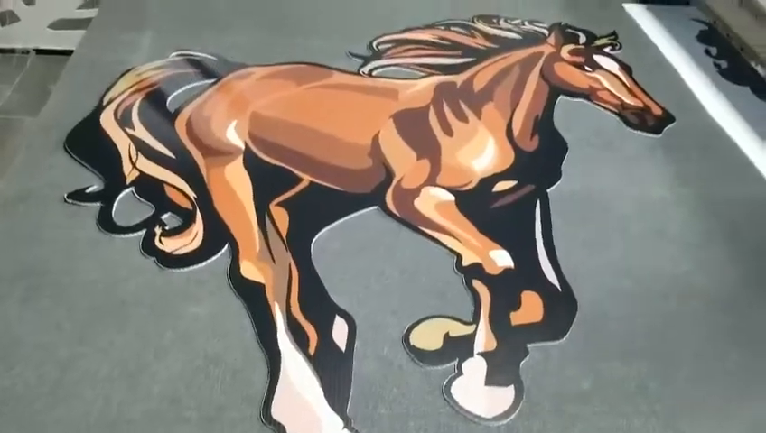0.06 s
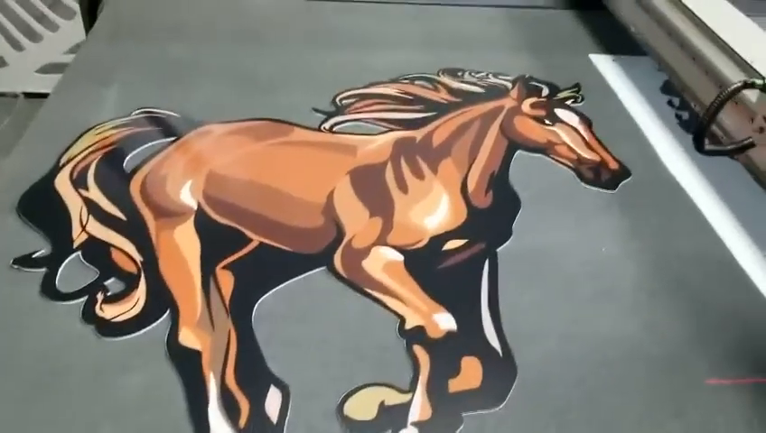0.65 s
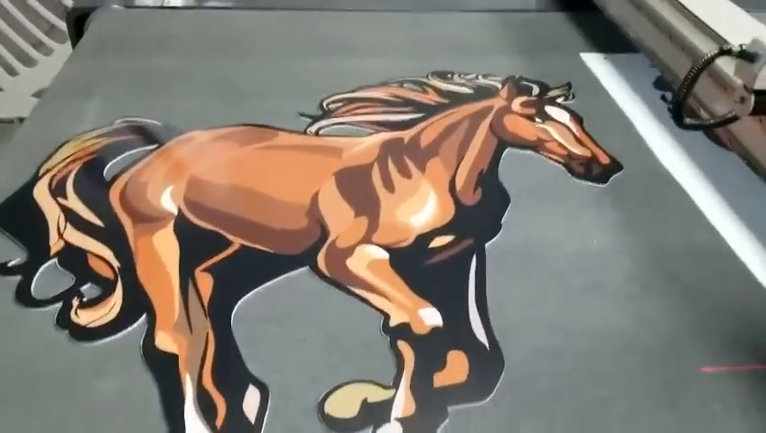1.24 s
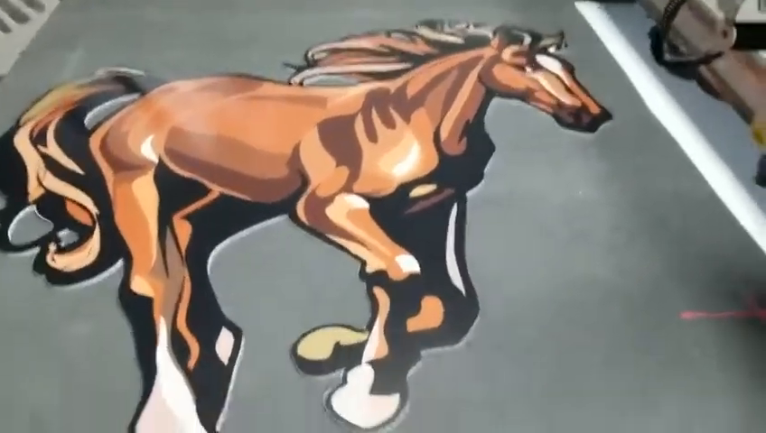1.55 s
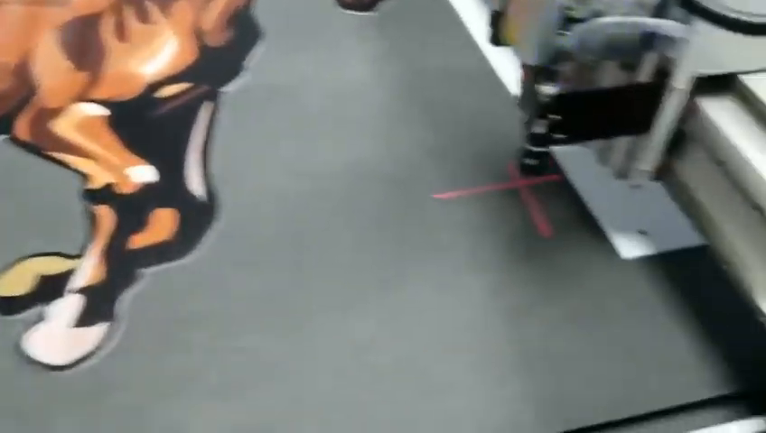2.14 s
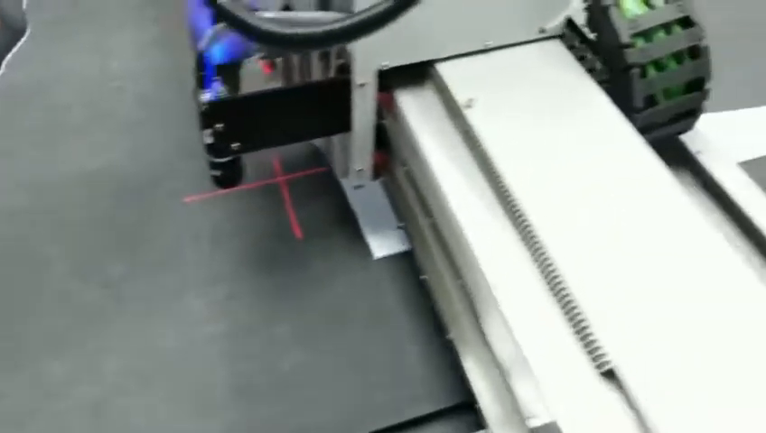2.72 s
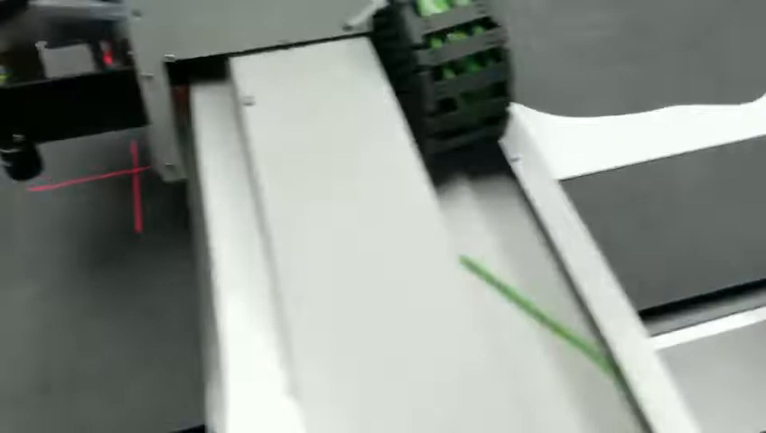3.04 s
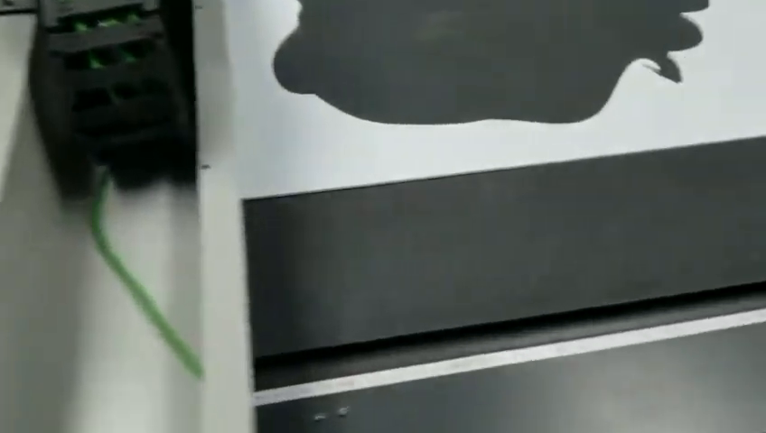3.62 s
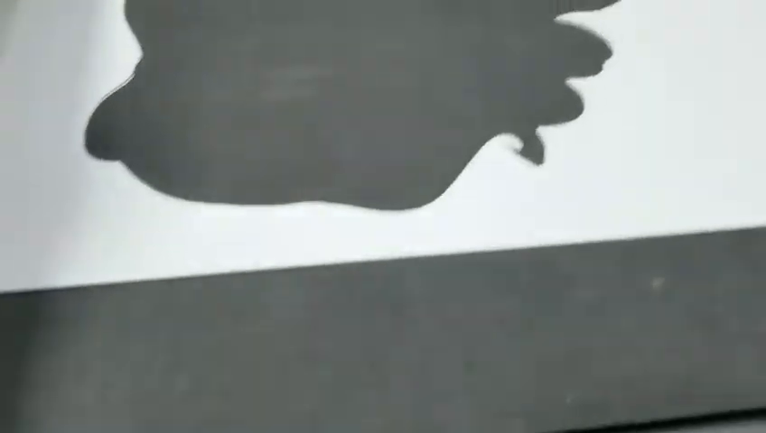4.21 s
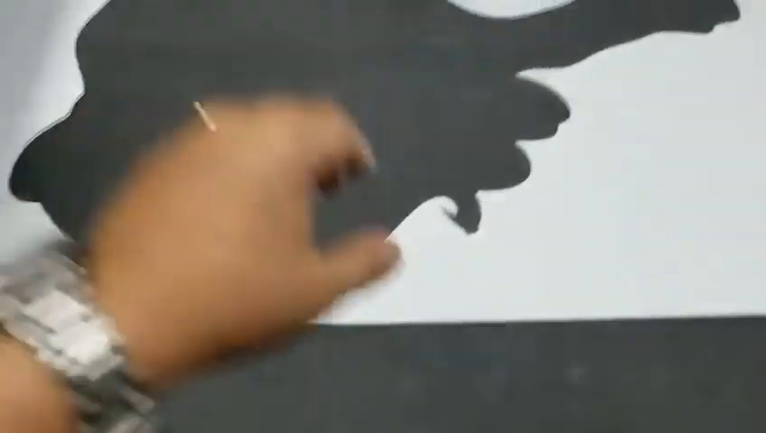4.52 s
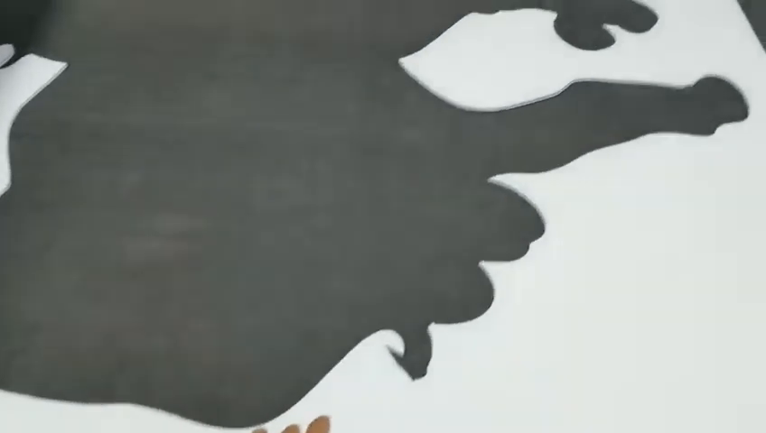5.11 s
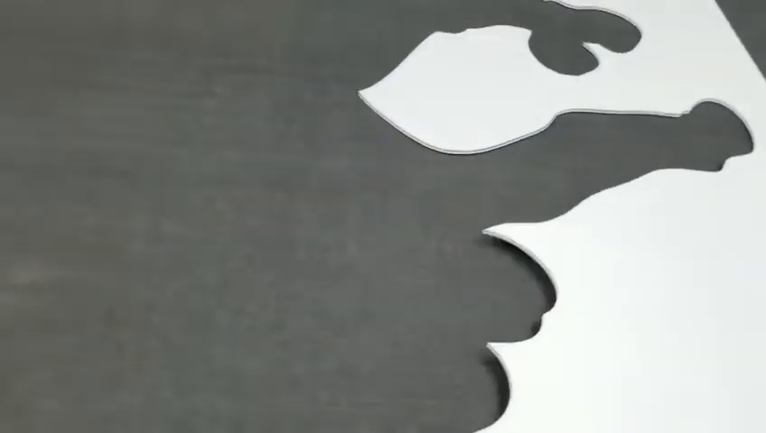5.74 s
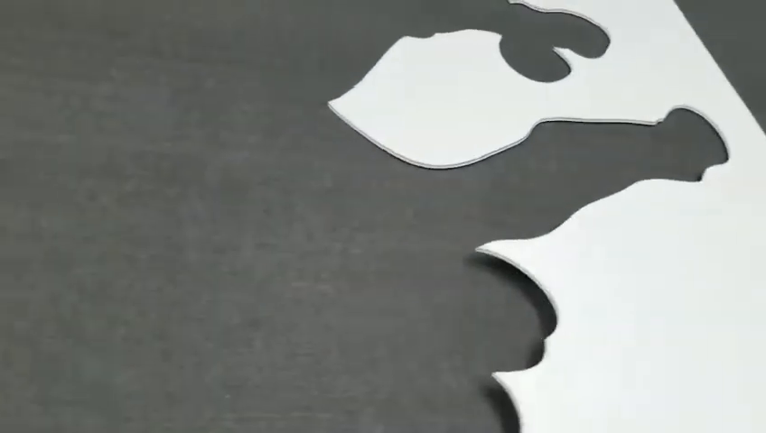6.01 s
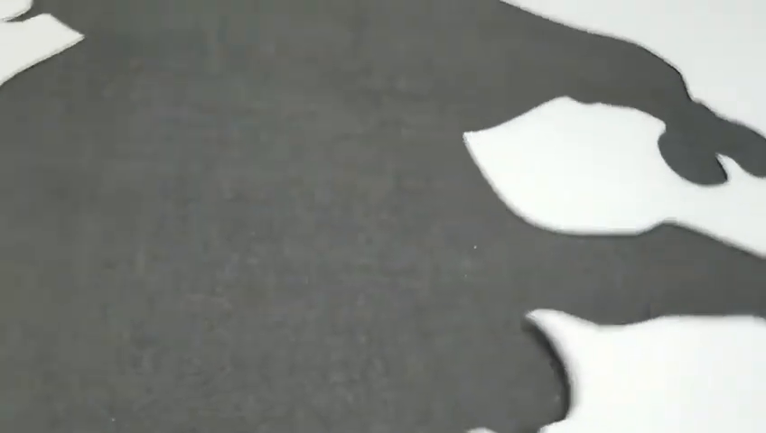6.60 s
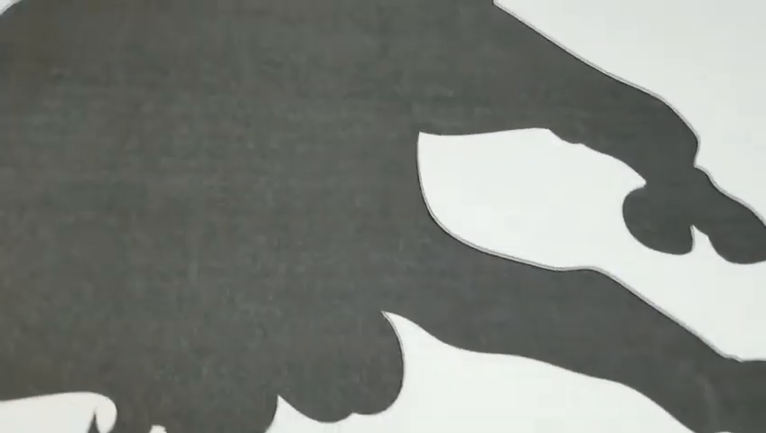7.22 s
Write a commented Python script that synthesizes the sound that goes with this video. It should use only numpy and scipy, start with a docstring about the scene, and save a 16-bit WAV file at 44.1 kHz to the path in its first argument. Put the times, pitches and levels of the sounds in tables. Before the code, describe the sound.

Air rushes and hums from an idling cutting table in a workshop, with a faint high whine and soft whistles drifting in and out. Light rustles and scuffs pass near the moving microphone. Toward the end a stiff sheet slides across the felt with a growing hiss, then gives two sharp, dry cracks with a few dull knocks, much louder than the machine.

```python
"""Sheet dragged off a cutting table

A flatbed cutter idles in a workshop: its blower hums, air whistles into the vacuum bed, servo drives
whine and motors drone low. Someone walks along the table with a few soft scuffs, then drags a cut
sheet over the felt. The stiff sheet hisses as it slides and snaps loudly twice as it bends free."""
import sys
import numpy as np
from scipy import signal
from scipy.fft import rfft, irfft
from scipy.io import wavfile
from scipy.ndimage import uniform_filter1d

SR = 44100
rng = np.random.default_rng(int(sys.argv[2]) if len(sys.argv) > 2 else 0)


def waveform_to_disk(signal):
    """Save audio, clipped to [-1, 1], as 16-bit WAV at the path in sys.argv[1]."""
    frames = np.transpose(np.atleast_2d(signal))
    scaled = np.clip(frames, -1, 1) * 32767
    samples = np.round(scaled).astype(np.int16)
    wavfile.write(sys.argv[1], SR, samples)


N = 324576
TIME = np.arange(N) / SR
BINS = np.fft.rfftfreq(N, 1 / SR)


# Fader rides for the long drag and the short one, louder as the sheet speeds up: t/s, level/dB
LONG_DRAG = [(5.04, -47), (5.11, -49), (5.18, -39.5), (5.27, -39.5), (5.35, -46), (5.47, -42.5),
             (5.82, -40.5), (6.03, -38), (6.29, -42), (6.48, -47.5), (6.6, -78)]
SHORT_DRAG = [(6.8, -62), (6.84, -64), (6.92, -58.5), (7.02, -47.5), (7.11, -50), (7.21, -51.5),
              (7.28, -52), (7.36, -51)]
# EQ of the bright felt hiss and of the lower rasp: f/Hz, level/dB
HISS_EQ = [(1500, -13.5), (2400, -6), (3200, -8), (4400, -5), (6500, -12), (9000, -9.5), (11000, -3.5),
           (12700, 4), (15500, 0)]
RASP_EQ = [(250, -7.5), (700, -9), (1100, -5.5), (1350, -7), (1650, -4.5), (1950, -5.5), (2450, -7.5),
           (3000, -13.5), (4000, -12), (7000, -21)]
# Stereo spread of the sheet: f/Hz, left minus right/dB
SHEET_PAN = [(600, 2.5), (1300, -4.5), (2400, -9), (4400, -2), (8000, 5), (12000, 1.5), (14500, 7)]
# Hollow body of the bed under the sheet: f/Hz, width/Hz, level/dB
BED_MODES = [(335, 26, -5), (439, 14, -0.5)]
def sliding(hiss_trim_db=3.5, rasp_db=-42, rasp_follow=0.5, usual_drag_db=-39, flat_sheet_db=-6.5):
    """Felt fibres hiss under the sheet; its bend radiates a stuttering rasp and the bed murmurs."""
    pan = panned(read(SHEET_PAN, BINS))
    hiss = noise(pan * gain_of(read(HISS_EQ, BINS)), grain_db=1.5)
    rasp = noise(pan * gain_of(read(RASP_EQ, BINS)), grain_db=3.8) * gain_of(drift(70))
    bend = np.clip((TIME - 5.07) / 0.76, 0, 1)  # 0 lying flat, 1 bent up
    murmur = envelope(5.14, length_s=0.48, attack_s=0.2, release_s=0.55) * gain_of(-51)
    out = murmur * unit_rms(resonances(BED_MODES))
    for drag in (LONG_DRAG, SHORT_DRAG):
        drag_db, = curves(drag)
        start, end = drag[0][0], drag[-1][0]
        gate = envelope(start, end - start, attack_s=0.034, release_s=0.034)
        rasp_ride = rasp_db + rasp_follow * (drag_db - usual_drag_db) + flat_sheet_db * (1 - bend)
        out += gate * (gain_of(drag_db + hiss_trim_db) * hiss + gain_of(rasp_ride) * rasp)
    catching = gain_of(drift(33))
    return out * catching


# Bending resonances of the sheet: f/Hz, width/Hz, level/dB
BEND_MODES = [(1110, 160, -7.5), (1900, 77, -2), (2070, 400, -1), (2310, 250, -4), (2560, 110, -7)]
def chatter(level_db=-37, stutter_db=0.5):
    """Stick and slip shakes the bent sheet as it is pulled hardest."""
    pull = envelope(5.96, length_s=0.2, attack_s=0.12, release_s=0.03)
    level = pull * gain_of(level_db - stutter_db * drift(90))
    return level * panned(side_db=-7) * unit_rms(resonances(BEND_MODES))


# EQ of a dry buckling crack: f/Hz, level/dB
CRACK_EQ = [(200, -25), (400, -6), (850, 2.5), (1350, 5.5), (1800, 4.5), (2700, -2), (3400, -3.5),
            (4500, 3), (5400, -4), (9300, -15), (11000, -11), (12600, -10), (15500, -10.5)]
def crack(tilt_db, side_db, ring_db, folds_hz, tick_hz, fold_octaves=0.18, tick_db=9, tick_width_hz=750):
    """One jerk of a crease: a sharp pulse that rings the folds, with a high tick on top."""
    hz = np.maximum(abs(np.fft.fftfreq(4096, 1 / SR)), 20)
    folds = sum(np.exp(-(np.log2(hz / fold) / fold_octaves) ** 2) for fold in folds_hz)
    tick = np.exp(-((hz - tick_hz) / tick_width_hz) ** 2)
    eq_db = read(CRACK_EQ, hz) + tilt_db * np.log2(hz / folds_hz[0]) + ring_db * folds + tick_db * tick
    gain = gain_of(eq_db) * panned(side_db + read(SHEET_PAN, hz))
    minimum_phase = np.exp(np.conj(signal.hilbert(np.log(gain))))  # the hardest attack for this EQ
    pulse = np.fft.ifft(minimum_phase).real
    return pulse / abs(pulse.mean(0)).max()


# Cues for snaps and taps: t/s, level/dB, tilt/dB per octave, left minus right/dB, crackle/dB, flap/dB,
# fold ring/dB, lower fold/Hz, upper fold/Hz, tick/Hz
SNAP_CUES = [(3.407, -30, -6, 6, -22, -40, 6, 2600, 3600, 12000),
             (6.215, -21, 0, -15, -22, -40, 6, 3280, 4430, 12500),
             (6.35, -31, -7.5, -4, -26, -25, 6, 1000, 1400, 12000),
             (6.4303, -10, 12, -13, -32, -44, 8.3, 3200, 4200, 11900),
             (6.4317, -5.5, -1.5, -4.5, -21, -24, 9.1, 2780, 3380, 12900),
             (6.4424, -27, -1, -6, -30, -44, 11, 3860, 4400, 12000),
             (7.1215, -1, 2, -2, -24, -38, 6.2, 2300, 4630, 13100),
             (7.1235, -21, 6, 4, -24, -44, 3, 2200, 4600, 14200),
             (7.1313, -16, -1, 5, -24, -44, 3, 2200, 4600, 12300)]
# A crease gives way in a quick flam of jerks: t/s from the cue, level/dB
CREASE_JERKS = [(-.0003, -10), (0, 0), (.0007, -12), (.003, -20)]
# Body of the flapping sheet: f/Hz, level/dB, t60/s
FLAP_MODES = [(290, -8, 0.033), (362, -4, 0.044), (527, -8, 0.035), (620, -0.5, 0.044), (780, 1, 0.067),
              (960, 0.5, 0.045), (1160, 9.5, 0.028), (1370, 5.5, 0.015), (2700, 9, 0.0073),
              (3220, 2, 0.009), (4260, 2, 0.0088)]
def snaps(crackle_s=0.0047, rise_s=0.00045):
    """The sheet buckles: dry cracks, a flap of its damped modes and a crackle of parting fibres."""
    out = np.zeros((2, N))
    fibres = noise(gain_of(read(HISS_EQ, BINS)))
    for s, db, tilt_db, side_db, crackle_db, flap_db, ring_db, *folds_hz, tick_hz in SNAP_CUES:
        pulse = crack(tilt_db, side_db, ring_db, folds_hz, tick_hz)
        for delay, jerk_db in CREASE_JERKS:
            add(out, s + delay * rng.uniform(0.9, 1.1), gain_of(db + jerk_db) * pulse)
        t = np.arange(pulse.shape[1]) / SR
        flap = sum(struck(t, hz, flap_db + mode_db, t60, rise_s) for hz, mode_db, t60 in FLAP_MODES)
        crackle = gain_of(crackle_db) * np.exp(-t / crackle_s) * fibres[:, :len(t)]
        add(out, s, gain_of(db) * (panned(side_db) * flap + crackle))
    return out


# Cues for dull thumps: t/s, level/dB, f/Hz, t60/s
BUMP_CUES = [(5.243, -35.5, 403, 0.068), (6.433, -27.5, 340, 0.05), (6.874, -33, 151, 0.056),
             (7.0777, -29.5, 181, 0.02), (7.079, -31.5, 420, 0.022), (7.123, -37, 332, 0.06)]
def bumps(rise_s=0.00032):
    """Hand and sheet knock on the bed, and the felt damps each blow at once."""
    out = np.zeros((2, N))
    t = np.arange(SR // 5) / SR
    for s, db, hz, t60 in BUMP_CUES:
        add(out, s, panned(0) * struck(t, hz, db, t60, rise_s))
    return out


# Cues for soft scuffs: t/s at the crest, length/s, level/dB, tilt/dB per octave
SCUFF_CUES = [(0.452, .012, -49, 6), (1.001, 0.088, -47.5, 1), (3.153, 0.014, -35, 8),
              (3.184, 0.075, -43, 0.5), (3.223, 0.035, -37, -2), (3.249, 0.025, -36.5, -0.5),
              (3.275, 0.044, -44.5, -1), (3.823, 0.087, -52.5, 4.5), (4.042, 0.037, -54, 1),
              (4.473, 0.075, -43.5, 2.5), (4.874, 0.13, -53.5, 4), (5.0, 0.09, -53, 7),
              (5.113, 0.077, -43.5, 1), (5.19, .08, -44, 2.5), (5.254, 0.073, -41.5, -4),
              (5.568, 0.014, -33, -14), (6.036, 0.23, -33, 7), (6.13, 0.13, -36, 1.5),
              (6.927, 0.04, -48, -29), (7.027, 0.047, -48, -3), (7.284, 0.26, -44.5, 5.5)]
# EQ of a scuff: f/Hz, level/dB
SCUFF_EQ = [(500, -35.5), (950, -15), (1500, 1.5), (2500, -0.5), (3300, 2.5), (4400, 1.5), (6500, -3),
            (9500, -10.5), (12500, -1), (15500, -7)]
def scuffs(trim_db=-2, room_db=-8, low_cut_hz=300):
    """Clothes, hand and sheet rub in short swells of fine friction, with a touch of room."""
    out = np.zeros((2, N))
    octaves = np.log2(np.maximum(BINS, 500) / 4000)
    for s, length, db, tilt_db in SCUFF_CUES:
        eq = gain_of(read(SCUFF_EQ, BINS) + tilt_db * octaves) * (BINS > low_cut_hz)
        out += gain_of(db + trim_db) * swell(s, length / 2) * noise(eq, grain_db=2.0)
    return out + gain_of(room_db) * workshop(out)


# Fader rides as the listener walks along the table: t/s, housing/dB, blade tone/dB, air/dB
BLOWER_RIDES = [(0, -53, -50, -47.5), (.75, -58, -50.5, -47), (1.0, -54.5, -53, -47),
                (1.5, -52, -53.5, -46.5), (2.7, -55, -52.5, -47), (3.1, -53, -55, -47.5),
                (3.7, -56, -54, -47.5), (4.2, -57, -59.5, -48), (4.6, -54, -58.5, -48),
                (6.7, -55, -57.5, -48), (7.1, -56, -57, -48.5), (7.36, -70, -58, -58)]
# EQ of the moving air in machine and room: f/Hz, level/dB
AIR_EQ = [(20, -25), (38, -10.5), (52, -2.5), (110, -5.5), (190, -9.5), (300, -14.5), (480, -13.5),
          (600, -15.5), (850, -12.5), (1450, -15.5), (2000, -14), (2600, -16.5), (3000, -28.5),
          (4200, -26.5), (5700, -27), (7000, -42), (9300, -49), (11500, -32.5), (15500, -35.5)]
# Hollow roar of housing and gantry, thin rush of the grille: f/Hz, width/Hz, level/dB
HOUSING_MODES = [(388.7, 47, -1), (438, 33, -4.5)]
GANTRY_MODES = [(382, 19, -3.5), (473, 23, 0)]
GRILLE_MODES = [(1764, 65, -68.5), (2364, 48, -65), (2600, 140, -62.5), (12060, 340, -67.5)]
def blower(gantry_db=-52.5):
    """A wash of turbulent air that rings the housing, the grille and the passing gantry."""
    housing_db, _, air_db = curves(BLOWER_RIDES)
    air = gain_of(air_db) * noise(gain_of(read(AIR_EQ, BINS)))
    housing = gain_of(housing_db) * unit_rms(resonances(HOUSING_MODES))
    pass_by = swell(2.64, half_width_s=1.7)
    gantry = gain_of(gantry_db) * pass_by * unit_rms(resonances(GANTRY_MODES))
    return air + housing + gantry + resonances(GRILLE_MODES)


# Partials of the hum: multiple of the blade tone, level/dB
BLADE_PARTIALS = [(1, 0), (3 / 4, -14)]
# Dead spots and hot spots of the hum: t/s, half width/s, left/dB, right/dB
HUM_SPOTS = [(2.15, 0.24, -20, -7), (2.75, 0.29, 4.5, 1.5), (3.55, 0.24, 3, 2), (4.0, 0.21, 3, -14),
             (4.55, 0.76, 3, 8.5)]
def impeller(blade_hz=520.4, waver=0.0016, trim_db=1.5, right_lag_s=0.0002):
    """The blower's blades hum; each ear moves through its own standing waves."""
    pitch = blade_hz * (1 + waver * drift(26))
    hum = sum(gain_of(db) * tone(order * pitch, stereo(0, right_lag_s)) for order, db in BLADE_PARTIALS)
    spots_db = sum(stereo(left, right) * swell(s, width) for s, width, left, right in HUM_SPOTS)
    flicker_db = np.array([drift(4.3), drift(5.3)])
    _, ride_db, _ = curves(BLOWER_RIDES)
    return gain_of(ride_db + trim_db + spots_db + flicker_db) * hum


# Cues for motor and fan runs: t/s, length/s, starting f/Hz, glide/Hz per s, level/dB
MOTOR_CUES = [(0.208, 0.61, 393, -8.5, -49.5), (0.713, 0.32, 278.7, -10.5, -56),
              (1.553, 0.5, 268.4, -2, -61.5), (2.83, 0.3, 260.4, -4, -56), (3.803, 0.17, 260.5, -4.5, -57),
              (4.276, 0.44, 259, -2, -60), (1.276, 0.36, 378, 11.5, -53), (2.452, 0.38, 380, -3, -54.5),
              (3.65, 0.28, 386, -2.5, -51.5), (3.103, 0.75, 78, 4, -53), (4.081, 1.1, 152.2, 4.5, -52.5),
              (5.25, 0.13, 156.5, 2, -54), (4.048, 0.46, 132, -4, -54.5), (4.883, 0.11, 131, -1, -44.5),
              (5.062, 0.86, 129.5, -4.5, -48), (5.965, 0.12, 127.2, -3, -44.5), (6.378, 0.3, 123, 1.5, -46),
              (6.824, 0.12, 123.9, -6, -50), (7.007, .13, 124, -5, -47), (4.797, .1, 75, -0.5, -51),
              (5.456, 0.24, 81, -8, -51), (6.271, 0.69, 72.7, 4.5, -49.5)]
def motors(trim_db=-2.5, throb_db=2.5, waver_hz=1.4, right_lag_s=0.0001):
    """Low drones come in, throb, slowly change speed and fade; they reach the left ear first."""
    out = np.zeros((2, N))
    for s, length, hz, glide, db in MOTOR_CUES:
        gate = envelope(s, length, attack_s=0.052, release_s=0.13)
        level = gate * gain_of(db + trim_db + throb_db * drift(28))
        pitch = hz + glide * (TIME - s) + waver_hz * drift(12.2)
        out += level * tone(pitch, stereo(0, right_lag_s))
    return out


# Cues for breathy whistles: t/s at the crest, half width/s, f/Hz, width/Hz, level/dB
LEAK_CUES = [(.36, 0.19, 2515, 41, -52), (0.548, 0.17, 2346, 36, -60), (2.0, 0.97, 2332, 18, -56.5),
             (2.65, 0.64, 1750, 26, -57.5), (4.15, 0.5, 2624, 15, -59.5), (5.0, 0.79, 1848, 25, -56)]
def leaks(trim_db=-2):
    """Air whistles through gaps in the vacuum bed, each swelling as the listener passes it."""
    whistles = sum(swell(s, half_width) * resonances([mode]) for s, half_width, *mode in LEAK_CUES)
    return gain_of(trim_db) * whistles


# Servo whine and the fainter whistle of a second drive: f/Hz, level/dB, left minus right/dB
WHINE_PARTIALS = [(8003, 0, 6), (7883, -14, 5), (8123, -15, 5)]
WHISTLE_PARTIALS = [(12143, -74, 3), (11913, -82, 3)]
# The whine is directional, and swells or sinks as the listener walks by: t/s, half width/s, level/dB
WHINE_SWELLS = [(.07, 0.12, 6), (.38, 0.2, -1), (.75, 0.18, 4.5), (1.12, .13, 5), (1.31, .05, 1),
                (1.45, 0.069, 9), (1.68, 0.11, 13), (2.25, 0.31, 10.5), (2.5, 0.068, 8.5), (2.72, 0.1, 1),
                (2.92, 0.038, 9), (3.1, .08, 2), (3.31, 0.056, 8), (3.45, .07, -1), (3.9, .2, 1),
                (4.3, 0.092, -3), (4.48, 0.12, 11), (4.8, 0.088, 7), (6.7, .8, 4)]
def drives(whine_trim_db=-73.5, flicker_db=2.5, wander_hz=5):
    """Servo switching tones and their sidebands, slightly unsteady, fading in and out at each ear."""
    def partial(hz, db, side_db):
        level = gain_of(db + flicker_db * drift(32))
        level = level * standing_wave(rate_hz=3.9, depth=stereo(0.7, 0.9))
        return level * panned(side_db) * tone(hz + wander_hz * drift(4))

    whine = sum(partial(*row) for row in WHINE_PARTIALS)
    whistle = sum(partial(*row) for row in WHISTLE_PARTIALS)
    swells_db = sum(db * swell(s, width) for s, width, db in WHINE_SWELLS)
    return gain_of(whine_trim_db + swells_db) * whine + whistle


# Reverb time of the workshop: f/Hz, t60/s
ROOM_DECAY = [(200, 0.46), (1000, 0.35), (2700, 0.11), (4400, 0.29), (14000, 0.51)]
def workshop(dry, rise_s=0.0014, early_boost=2.5, early_s=0.0023):
    """Dense reflections from table, gantry and walls, each band dying at its own speed."""
    hz, t, bands = signal.stft(rng.standard_normal((2, SR // 2)), SR, nperseg=256)
    decay = gain_of(-60 * t / read(ROOM_DECAY, hz)[:, None])
    _, tail = signal.istft(bands * decay, SR, nperseg=256)
    age = np.arange(tail.shape[1]) / SR
    tail *= np.minimum(age / rise_s, 1) * (1 + early_boost * np.exp(-age / early_s))
    tail /= np.linalg.norm(tail[0])
    return signal.fftconvolve(dry.mean(0)[None], tail, axes=1)[:, :N]


# Stereo image of the noise, near mono in the bass: f/Hz, left-right correlation
EAR_CORRELATION = [(60, 1), (130, 0.97), (290, 0.95), (600, 0.75), (1200, -0.3), (2400, 0.14), (15000, 0)]
def noise(eq, grain_db=0):
    """Stereo noise through an EQ; grain roughens it into a hail of unequal tiny impulses."""
    white = rng.standard_normal((2, N))
    grain = gain_of(grain_db * np.minimum(rng.exponential(1, N), 6))
    left, unrelated = rfft(white * grain)
    alike = read(EAR_CORRELATION, BINS)
    right = alike * left + np.sqrt(1 - alike ** 2) * unrelated
    x = irfft(np.array([left, right]) * eq, N)
    return x / np.std(x.mean(0))


def resonances(modes):
    """Noise ringing in a set of resonances."""
    return sum(gain_of(db) * noise(1 / (1 + ((BINS - hz) / width) ** 2)) for hz, width, db in modes)


def mottled(x, depth_db, frame):
    """Narrow bands above the bass lift and dip at random, more slowly with longer frames."""
    hz, _, bands = signal.stft(x, SR, nperseg=frame)
    ripple = uniform_filter1d(rng.standard_normal(bands.shape), size=4, axis=1)  # across bands
    ripple = unit_rms(uniform_filter1d(ripple, size=12, axis=2))  # across time
    ripple *= np.clip(hz / 1000, 0, 1)[:, None]
    _, rippled = signal.istft(bands * gain_of(depth_db * ripple), SR, nperseg=frame)
    return unit_rms(rippled[:, :N]) * np.std(x)


def standing_wave(rate_hz, depth):
    """Gain at each ear as it moves unevenly through a standing wave: broad crests, narrow dips."""
    turns = [np.cumsum(rate_hz * (1 + 0.5 * drift(rate_hz))) / SR + rng.random() for ear in range(2)]
    return np.sqrt(1 + depth * np.cos(2 * np.pi * np.array(turns)))


def struck(t, hz, db, t60, rise_s):
    """One struck mode: a sine that rises fast and rings down."""
    return gain_of(db - 60 * t / t60) * (1 - np.exp(-t / rise_s)) * np.sin(2 * np.pi * hz * t)


def tone(hz, lag_s=0):
    """A sine of rms 1 that follows a pitch curve and may arrive a little late."""
    return np.sqrt(2) * np.sin(2 * np.pi * (np.cumsum(hz) / SR - hz * lag_s + rng.random()))


def drift(rate_hz):
    """Smooth random modulation of rms 1."""
    low_pass = np.exp(-(BINS / rate_hz) ** 2) * (BINS > 0)
    return unit_rms(irfft(rfft(rng.standard_normal(N)) * low_pass, N))


def envelope(start_s, length_s, attack_s, release_s):
    """Fades in, holds to the end of its length, then fades out."""
    age = TIME - start_s
    return np.clip(np.minimum(age / attack_s, 1 - (age - length_s) / release_s), 0, 1)


def swell(s, half_width_s):
    """A smooth hump of height 1 around time s."""
    return np.exp(-((TIME - s) / half_width_s) ** 2)


def curves(rows):
    """Each level column of a table as a fader ride over the whole scene."""
    s, *columns = np.transpose(rows)
    return [np.interp(TIME, s, column) for column in columns]


def read(points, hz):
    """Reads a curve on a log-frequency axis."""
    f, value = np.transpose(points)
    return np.interp(np.log(hz + 1), np.log(f + 1), value)


def add(mix, s, sound):
    """Mixes a stereo sound in at time s."""
    part = mix[:, max(round(s * SR), 0):][:, :sound.shape[1]]
    part += sound[:, :part.shape[1]]


def stereo(left, right):
    """One value for each ear."""
    return np.array([[left], [right]])


def panned(side_db):
    """Left and right gains for a level difference."""
    return gain_of(stereo(0.5, -0.5) * side_db)


def gain_of(db):
    """Decibels to gain."""
    return 10 ** (np.asarray(db) / 20)


def unit_rms(x):
    """Scales to an rms of 1."""
    return x / np.sqrt(np.mean(x ** 2) + 1e-20)


def scene(room_db=-3.5):
    """The handling of the sheet up front, the idling machine behind it."""
    hits = snaps() + bumps()
    # narrow bands of the sheet's hiss flutter quickly at random
    rubbing = mottled(sliding() + chatter(), depth_db=1.8, frame=512)
    sheet = mottled(rubbing, depth_db=3.1, frame=4096)  # a slower shimmer on top
    handling = hits + gain_of(room_db) * workshop(hits) + scuffs() + sheet
    air = mottled(blower(), depth_db=2.9, frame=4096)
    return handling + air + leaks() + impeller() + drives() + motors()


def record(dry):
    """A steep high cut on the whole mix."""
    high_cut = signal.firwin(801, cutoff=15700, window=("kaiser", 9), fs=SR)
    return signal.oaconvolve(dry, high_cut[None], "same")


dry = scene()
out = record(dry)
waveform_to_disk(out)
```